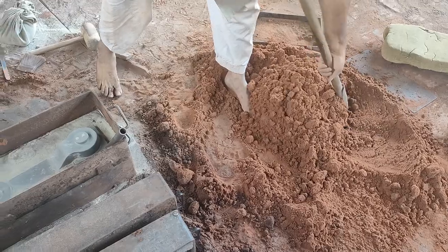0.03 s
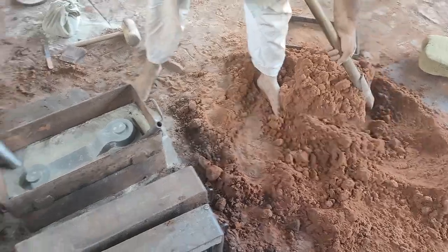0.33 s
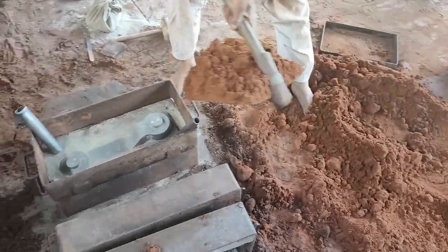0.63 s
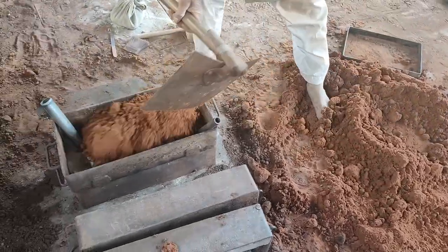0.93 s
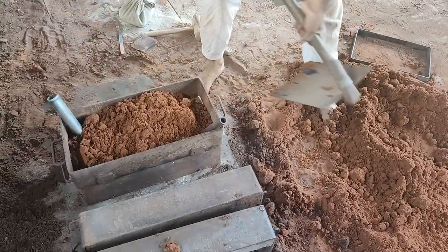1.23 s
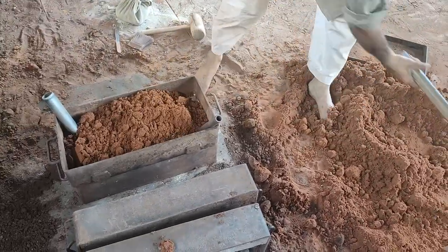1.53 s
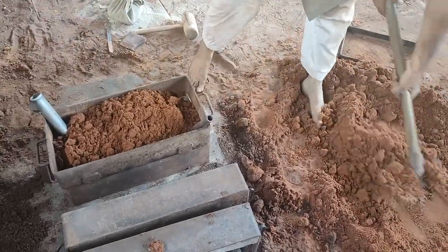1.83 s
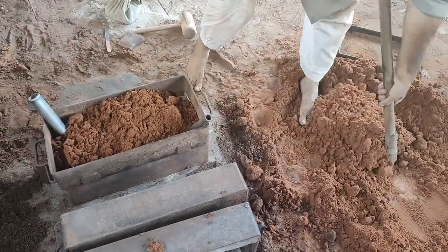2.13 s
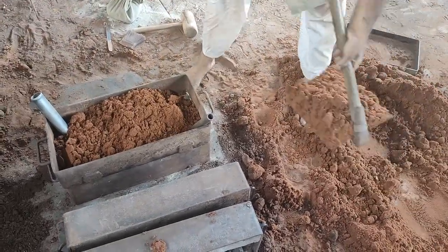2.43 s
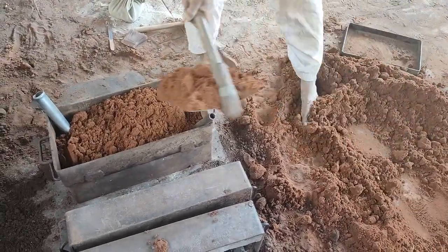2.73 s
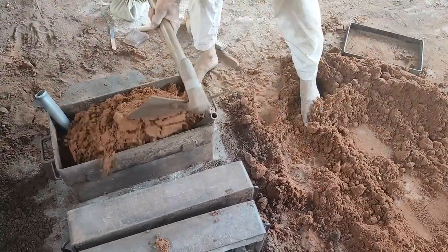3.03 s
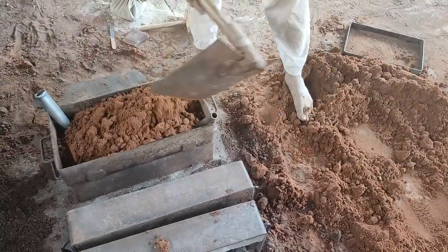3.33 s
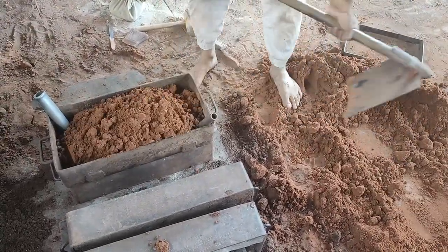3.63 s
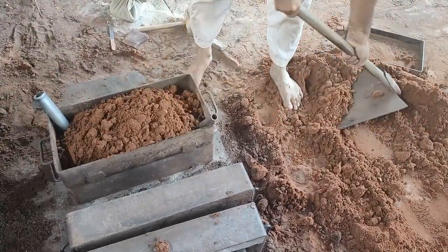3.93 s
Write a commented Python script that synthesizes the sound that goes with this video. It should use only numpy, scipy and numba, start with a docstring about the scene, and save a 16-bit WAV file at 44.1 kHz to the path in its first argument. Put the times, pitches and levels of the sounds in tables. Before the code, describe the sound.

Machinery roars and whines steadily while steel is struck five times and a shovel drops sand.

```python
"""A steady roar and a high whine fill a foundry yard. The roar is a blower pushing air through ducts;
the whine is a machine, probably an induction furnace. Off to the right, steel is struck five times:
it cracks, clatters and rings. Close by, a shovel digs damp sand and drops it into a moulding box
with dull thuds. A limiter pushes the drone down after every blow."""
import sys
import numpy as np
from scipy import signal
from scipy.fft import rfft, irfft
from scipy.io import wavfile
from scipy.ndimage import uniform_filter1d, minimum_filter1d
from numba import njit

SR = 44100
rng = np.random.default_rng(int(sys.argv[2]) if len(sys.argv) > 2 else 0)


def to_wav(s):
    """Save 16-bit WAV."""
    ch = np.atleast_2d(s).T  # columns
    pcm = np.round(np.clip(ch, -1, 1) * 32767)  # PCM
    wavfile.write(sys.argv[1], SR, pcm.astype(np.int16))


N = 176400

# The blower's roar and hiss. Each row: frequency in Hz, left and right strength in dB.
ROAR_COLOUR = [(20, -71, -75.5), (45, -67.5, -63), (78, -67.5, -67.5), (96.5, -62, -61.5),
               (133, -57, -56.5), (173, -66.5, -63), (210.6, -59, -58), (247.3, -71, -69.5),
               (430, -74.5, -71.5), (515, -75.5, -73.5), (700, -77.5, -75), (1100, -80, -76),
               (1860, -80, -75.5), (2140, -87.5, -73.5), (3020, -81.5, -70.5), (3620, -85, -73.5),
               (4440, -85.5, -82), (5870, -83, -79), (6700, -86.5, -89.5), (7940, -91.5, -99.5)]
# Notes that the ducts boost. Each row: frequency in Hz, width in Hz, boost in dB.
DUCT_NOTES = [(135, 4.7, 2), (278, 27, 6), (520.6, 18, 9), (677, 13, 9), (802, 20, 9)]
# How alike the roar is on both sides. Each row: frequency in Hz, likeness from 0 to 1.
ROAR_LIKENESS = [(60, 0.97), (230, 0.8), (460, 0.61), (900, 0.4), (2000, 0.27), (7000, 0.01)]
# The slow drift of the blower's bass. Each row: time in seconds, change in dB.
BASS_DRIFT = [(0, -3), (0.6, 0.5), (1.1, -1.5), (1.5, 1.5), (2.4, 0.5), (3.5, 0), (3.9, -1)]
# The whine's harmonics 1 and 2 (multiples of its pitch). Each row: time in seconds, then relative
# levels in dB of the first on the left and right, and of the second on the left and right.
LOW_HARMONICS = [(0.08, -60, -45.5, -42.5, -42.5), (0.3, -60, -45, -41, -47), (0.5, -57, -44, -46.5, -40),
                 (0.73, -54, -45.5, -51, -39.5), (0.88, -52.5, -46.5, -44, -41),
                 (1.12, -52, -45.5, -41, -45.5), (1.38, -54, -47.5, -44.5, -47), (1.5, -55, -48, -42, -41),
                 (1.75, -55, -47, -44, -42), (2.1, -56, -47.5, -55, -48), (2.33, -53.5, -46, -54, -38),
                 (2.85, -56, -50, -59, -39), (3.1, -53, -48.5, -54, -39.5), (3.55, -53.5, -49.5, -51, -37),
                 (3.95, -52.5, -51, -57.5, -38)]
# Harmonics 3 and 4 on the left. Each row: time in seconds, level of each in dB.
HIGH_HARMONICS = [(0, -62, -74), (0.28, -60, -61), (0.45, -52, -52), (0.68, -58, -60), (0.85, -57, -53.5),
                  (1.15, -55.5, -59.5), (1.5, -51.5, -59), (1.85, -54, -56), (2.15, -56.5, -73),
                  (2.6, -53.5, -63), (2.9, -49.5, -55.5), (3.3, -52, -62.5), (4.0, -54.5, -66.5)]
# The whine's head start at the right ear as the listener moves. Each row: time and lead in seconds.
RIGHT_LEAD = [(0.2, 4e-5), (0.5, 13e-5), (0.8, 7e-5), (1.9, 9e-5), (2.1, -1e-5), (2.6, -2e-5), (2.8, 1e-4),
              (3.9, 7e-5)]
# Sand landing and the shovel pushing in. Each row: start in seconds, level in dB, length in seconds.
SAND_THUDS = [(0.344, -36, 0.053), (0.977, -32.5, 0.045), (1.196, -39.5, 0.051), (2.177, -42, 0.051),
              (2.336, -32.5, 0.012), (2.56, -33, 0.022), (3.049, -43, 0.1), (3.731, -39, 0.04),
              (3.821, -40, 0.018), (3.877, -33, 0.042)]
# The dull tone of a thud. Each row: frequency in Hz, strength in dB.
THUD_TONE = [(40, -22), (100, -4), (150, 10.5), (220, 1), (330, -11.5), (550, -3.5), (1200, -29),
             (4000, -41.5), (8000, -82)]
# Sand sliding on the blade. Each row: start in seconds, length in seconds, level in dB.
SAND_SLIDES = [(0.333, 0.036, -42), (0.906, 0.1, -48), (1.41, 0.04, -47), (1.458, 0.15, -44),
               (1.717, 0.09, -37.5), (2.184, 0.067, -41.5), (2.96, 0.036, -43), (3.274, 0.049, -36.5),
               (3.374, 0.031, -34.5), (3.49, 0.058, -48)]
# The hiss of sliding sand. Each row: frequency in Hz, strength in dB.
SLIDE_TONE = [(200, -7), (700, 0), (1500, -8), (3000, 1.5), (5500, -5.5), (7300, -10), (8500, -33)]
# Blows on steel and their rebounds. Each row: start in seconds, crack in dB, clatter in dB,
# clatter hold in seconds, echo in dB, then the ring of the low, middle and high notes in dB.
STEEL_BLOWS = [(0.161, -17.5, -30, 0.023, -37, -35, -46, -40),
               (0.188, -32, -34, 0.029, -30.5, -30, -52, -48),
               (0.666, -22, -28, 0.019, -33.5, -39.5, -43.5, -46),
               (0.684, -22, -30.5, 0.019, -30.5, -30.5, -50, -45),
               (1.2303, -17, -24.5, 0.013, -25, -26.5, -47, -25.5),
               (1.246, -30, -25.5, 0.018, -27, -32, -47, -22.5),
               (1.9263, -21.5, -27, 0.023, -26.5, -29, -34, -24),
               (1.95, -27, -28.5, 0.0078, -32, -20.5, -36, -31),
               (1.985, -41, -46, 0.0087, -31.5, -23, -36.5, -33),
               (2.629, -34, -35.5, 0.0074, -30.5, -20.5, -19, -30),
               (2.756, -51, -46, .01, -52, -33.5, -34, -41)]
# The steel's ringing notes. Each row: pitch in Hz, left and right gain in dB, seconds to fade 60 dB.
STEEL_NOTES = [(2277, -24, -13, .3), (2401, -23, -12, .25), (2514, -24, -13, .3), (2850, -21, -9, .2),
               (2952, -16, -2, .42), (2991, -20, -7, .35), (3074, -21, -7, .35), (3881, -23, -14, .25),
               (4124, -26, -17, .35), (6018, -15, -4, .25), (7386, -14, -20, .38), (8796, -3, -10, .1),
               (10200, -19, -25, .12)]
# The tone of a blow. Each row: frequency in Hz, then crack, left clatter and right clatter in dB.
BLOW_TONE = [(200, 5.5, -26, -29), (506, -2, -18, -15), (920, -6, -7, -7), (1580, 1, -18, -6.5),
             (2180, -3.5, -14.5, -2), (2990, 0, -12, 1.5), (4030, 10.5, -11.5, -7.5),
             (4800, -8.5, -22, -14), (5800, 18, -12, -10.5), (6700, -9, -20, -29), (10100, 2, -20, -25)]
# Metal scraping just before a blow. Each row: start in seconds, length in seconds, level in dB.
STEEL_SCRAPES = [(0.133, 0.04, -34.5), (0.645, 0.034, -37), (1.883, 0.041, -37), (2.582, 0.086, -25.5)]
# What the yard gives back of a blow. Each row: frequency in Hz, strength in dB.
ECHO_TONE = [(1000, -6.5), (2800, -4.5), (4200, -2), (6000, -5), (9000, -25)]

ROAR_GAIN_DB, FLUTTER_DB, LEFT_LAG_S = 0.5, 1.7, 0.00023
WHINE_HZ, WANDER_HZ, SIDE_TONE_HZ, DIPS_PER_S, DIP_S = 1771.8, 0.36, 1942, 5, 0.032
CRACK_FALL_S, CLATTER_FALL_S, ECHO_FADE_S, SQUEAL_DB = 0.0018, 0.013, 0.56, -13.5
LOW_RING_HZ, MID_RING_HZ, HIGH_RING_HZ = 4200, 6000, 7300
LIMIT_DB, LIMIT_ATTACK_S, LIMIT_RELEASE_S, TOP_HZ = -20.5, 0.00027, 0.11, 7600
FREQS = np.arange(N // 2 + 1) * SR / N


def undb(db):
    """Turn decibels into a volume factor."""
    return 10 ** (np.asarray(db) / 20)


def unit(x):
    """Scale a signal to an average power of 1."""
    return x / np.sqrt(np.mean(x ** 2))


def white():
    """Plain hiss, different on each side."""
    return rng.standard_normal((2, N))


def over_frequency(table, column=1):
    """Read a table's column at every frequency."""
    rows = np.array(table, float)
    return np.interp(np.log(FREQS + 1), np.log(rows[:, 0]), rows[:, column])


def over_time(t, table):
    """Read each of a table's value columns at every moment."""
    times, *columns = np.array(table).T
    return np.array([np.interp(t, times, column) for column in columns])


def gains(table, column=1):
    """A volume factor for every frequency, from a dB column."""
    return undb(over_frequency(table, column))


def colour(noise, gain):
    """Shape the tone of a noise and set its power to 1."""
    return unit(irfft(rfft(noise) * gain, N))


def walk(rate_hz):
    """Smooth random motion with a spread of 1."""
    count = int(3 * rate_hz * N / SR) + 2
    draws = rng.standard_normal(count) + 1j * rng.standard_normal(count)
    hz = FREQS[:count]
    return unit(irfft(draws * np.exp(-(hz / rate_hz) ** 2) * (hz > 0), N))


def quiver(rate_hz):
    """Random wobble of a tone's strength and timing, separate on each side."""
    return np.array([walk(rate_hz) + 1j * walk(rate_hz) for _ in range(2)])


def swells(t, table):
    """A rounded rise and fall for each row."""
    return sum(undb(db) * np.sin(np.pi * np.clip((t - start) / length, 0, 1))
               for start, length, db in table)


def fall(t, start, hold, decay):
    """Start suddenly, hold, then die away."""
    return (t >= start) * np.exp(-np.maximum(t - start - hold, 0) / decay)


@njit
def follow(x, attack, release):
    """Track a signal's peaks, rising and falling at separate speeds."""
    out, level = np.empty(len(x)), 0.
    for i in range(len(x)):
        level += (x[i] - level) * (attack if x[i] > level else release)
        out[i] = level
    return out


def blower(t):
    """Air churns in ducts: the bass flutters on both sides together, the hiss is smooth and wide."""
    likeness = over_frequency(ROAR_LIKENESS)
    shared, spread = rfft(white()) * np.sqrt([(1 + likeness) / 2, (1 - likeness) / 2])
    air = np.array([shared + spread, shared - spread])
    air[0] *= np.exp(-2j * np.pi * FREQS * LEFT_LAG_S)
    air *= np.array([gains(ROAR_COLOUR, 1), gains(ROAR_COLOUR, 2)]) * np.sqrt(SR / 2)
    air *= undb(sum(db / (1 + (2 * (FREQS - hz) / width) ** 2) for hz, width, db in DUCT_NOTES))
    air /= 1 + (FREQS / 8100) ** 40  # the hiss ends near 8100 Hz
    bass_share = 1 / (1 + (FREQS / 900) ** 2)
    bass = irfft(air * bass_share, N) * undb(over_time(t, BASS_DRIFT) + FLUTTER_DB * walk(24))
    hiss = irfft(air * (1 - bass_share), N)
    return undb(ROAR_GAIN_DB) * (bass + hiss)


def furnace(t):
    """A whine that slips out of step a few times a second, dipping briefly each time."""
    cycles = np.cumsum(WHINE_HZ + WANDER_HZ * walk(7.8)) / SR
    slip_times = np.cumsum(rng.gamma(2, 1 / (2 * DIPS_PER_S), size=60))
    slips_so_far = np.searchsorted(slip_times, t)

    def tone(multiple, rough, slip, lead):
        phase = np.cumsum(slip * rng.standard_normal(61))[slips_so_far]
        held = uniform_filter1d(np.exp(1j * phase), int(DIP_S * SR))  # blending a slip makes the dip
        ear_cycles = cycles - np.array([[1], [0]]) * lead * WHINE_HZ
        wave = np.exp(2j * np.pi * multiple * ear_cycles)
        return np.sqrt(2) * np.real((held + rough * quiver(32)) * wave)

    low_db = over_time(t, LOW_HARMONICS)
    third_db, fourth_db = over_time(t, HIGH_HARMONICS)
    lead = over_time(t, RIGHT_LEAD)
    out = tone(1, rough=0.33, slip=1.09, lead=lead) * undb(low_db[:2] + 2.5)
    second_db = low_db[2:] + 3.5 + 0.35 * quiver(4.6).real
    out += tone(2, rough=0.22, slip=1.86, lead=lead) * undb(second_db)
    for multiple, left_db, right_drop_db in ((3, third_db, 9), (4, fourth_db, 8)):
        level_db = np.array([left_db, left_db - right_drop_db]) + 0.4 * quiver(4).real
        out += tone(multiple, rough=0.52, slip=0.87, lead=4e-5) * undb(level_db)
    side_tone = tone(SIDE_TONE_HZ / WHINE_HZ, rough=0.18, slip=1.0, lead=lead)
    side_db = np.array([[-66], [-54]]) + 2 * quiver(1.8).real
    return out + side_tone * undb(side_db)


def shovel(t):
    """Damp sand lands with dull thuds and slides over the blade in fine grains."""
    thud = colour(rng.standard_normal(N) + 0.16 * white(), gains(THUD_TONE))
    thud_level = sum(undb(db) * fall(t, start, length / 2, length / 2)
                     for start, db, length in SAND_THUDS)
    grain_db = 4.9 * np.minimum(rng.exponential(size=N), 4)
    grains = colour(white() * undb(grain_db), gains(SLIDE_TONE))
    slide_level = swells(t, SAND_SLIDES) * undb(2 * walk(60)) * undb([[-3], [0]])
    return thud * uniform_filter1d(thud_level, 200) + grains * slide_level


def steel_ring(t, scrape):
    """Each blow sets the steel's own notes ringing; scraping makes the high ones squeal."""
    out = np.zeros((2, N))
    for hz, left_db, right_db, fade_s in STEEL_NOTES:
        kicks = np.zeros(N)
        for start, _, _, _, _, *ring_db in STEEL_BLOWS:
            kick_db = np.interp(hz, (LOW_RING_HZ, MID_RING_HZ, HIGH_RING_HZ), ring_db)
            kicks[int(start * SR)] = undb(kick_db)
        kept_per_sample = np.exp(-2 * np.log(1000) / (fade_s * SR))
        energy = signal.lfilter([1], [1, -kept_per_sample], kicks ** 2)
        squeal = (hz > MID_RING_HZ) * undb(SQUEAL_DB) * scrape
        rough_note = np.real((1 + 0.82 * quiver(23)) * np.exp(2j * np.pi * hz * t))
        out += undb([[left_db], [right_db]]) * (np.sqrt(energy) + squeal) * rough_note
    return out


def steel(t):
    """Each blow cracks, clatters off nearby surfaces, echoes and rings; most follow a short scrape."""
    crack = colour(rng.standard_normal(N) + 0.7 * white(), gains(BLOW_TONE)) * undb([[-3], [0]])
    clatter_tone = np.array([gains(BLOW_TONE, 2), gains(BLOW_TONE, 3)])
    clatter = colour(white() * undb(3.6 * walk(190)), clatter_tone)
    echo = colour(white() * undb(2.05 * walk(70)), clatter_tone * gains(ECHO_TONE))
    scrape = swells(t, STEEL_SCRAPES)
    out = clatter * scrape
    echo_energy = np.zeros(N)
    for start, crack_db, clatter_db, hold, echo_db, *_ in STEEL_BLOWS:
        out += undb(crack_db) * crack * fall(t, start, 0, CRACK_FALL_S)
        out += undb(clatter_db) * clatter * fall(t, start, hold, CLATTER_FALL_S)
        echo_energy += (undb(echo_db) * fall(t, start, 0, ECHO_FADE_S / np.log(1000))) ** 2
    return out + echo * np.sqrt(echo_energy) + steel_ring(t, scrape)


def scene():
    """Add up the sounds of the yard."""
    t = np.arange(N) / SR
    return blower(t) + furnace(t) + shovel(t) + steel(t)


def record(dry):
    """A limiter turns both sides down at loud peaks and recovers slowly; the top treble is cut."""
    attack = 1 - np.exp(-1 / (LIMIT_ATTACK_S * SR))
    peak = follow(np.abs(dry).max(axis=0), attack, 1 / (LIMIT_RELEASE_S * SR))
    gain = np.minimum(1, undb(LIMIT_DB) / (peak + 1e-9))
    gain = uniform_filter1d(minimum_filter1d(gain, 45), 45)  # smooth over about 1 ms
    treble_cut = signal.ellip(8, 0.3, 27, TOP_HZ, fs=SR, output="sos")
    deeper_cut = signal.ellip(8, 0.3, 60, 12000, fs=SR, output="sos")
    return signal.sosfilt(deeper_cut, signal.sosfilt(treble_cut, dry * gain))


dry = scene()
out = record(dry)
to_wav(out)
```